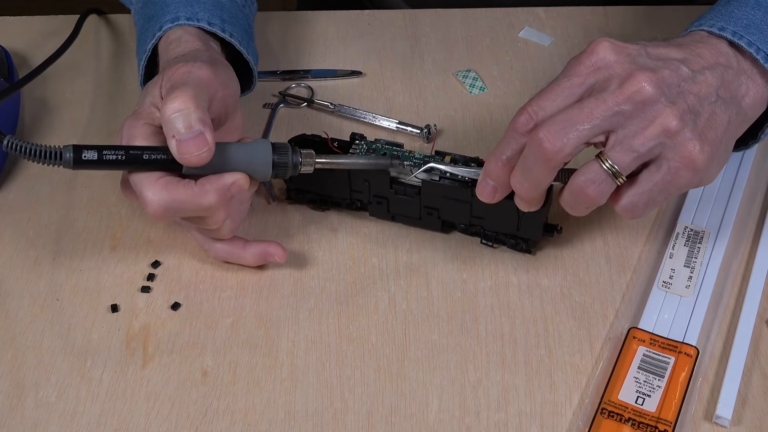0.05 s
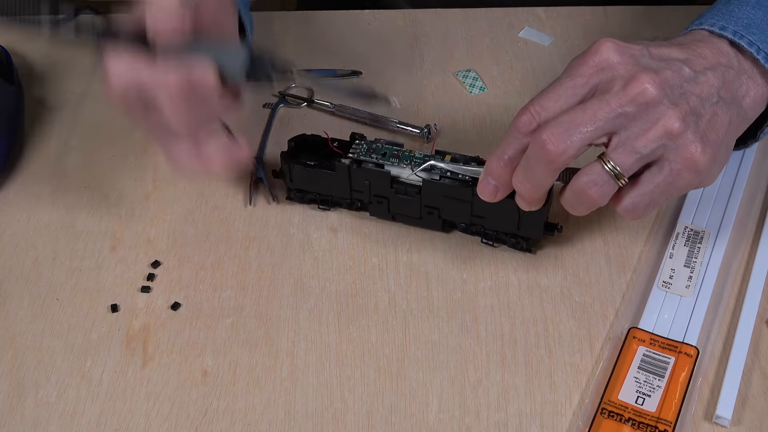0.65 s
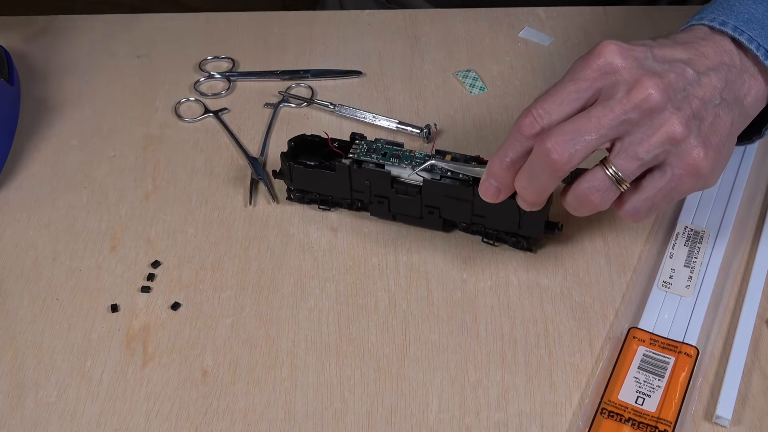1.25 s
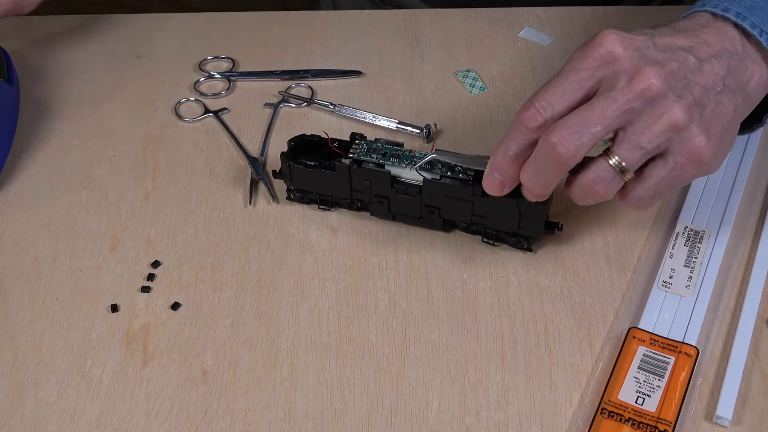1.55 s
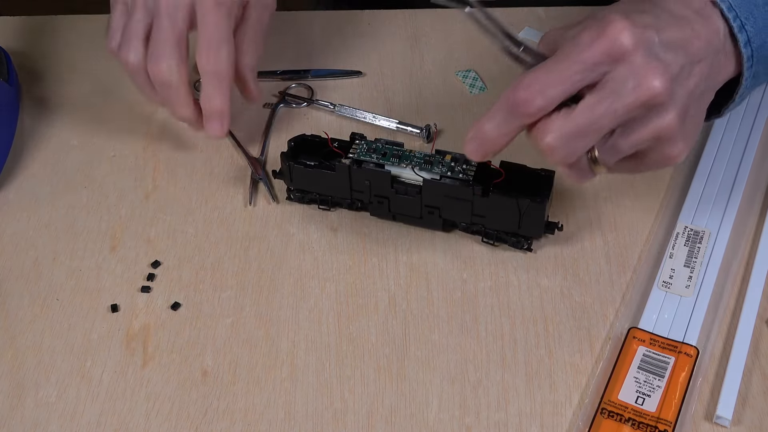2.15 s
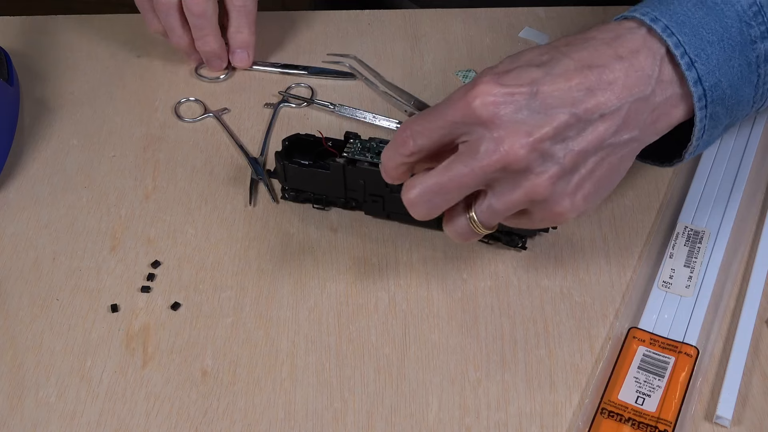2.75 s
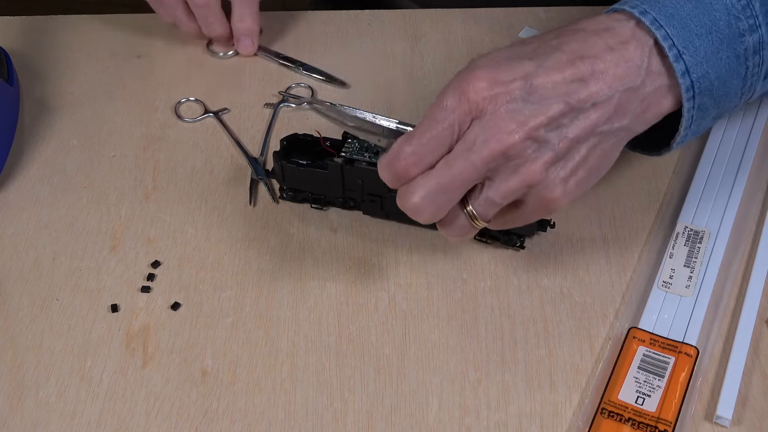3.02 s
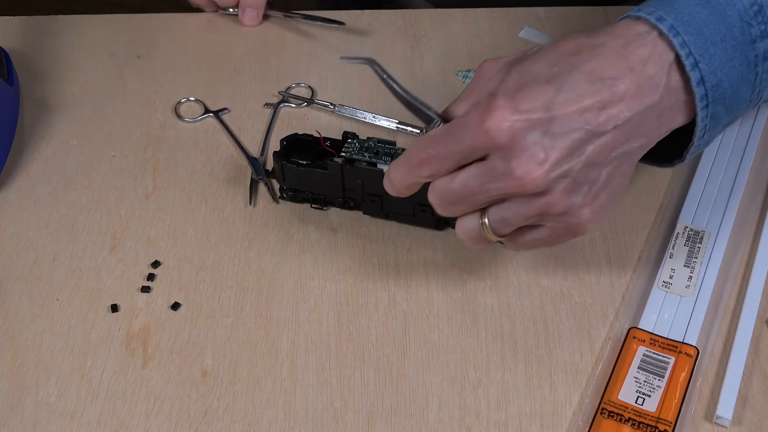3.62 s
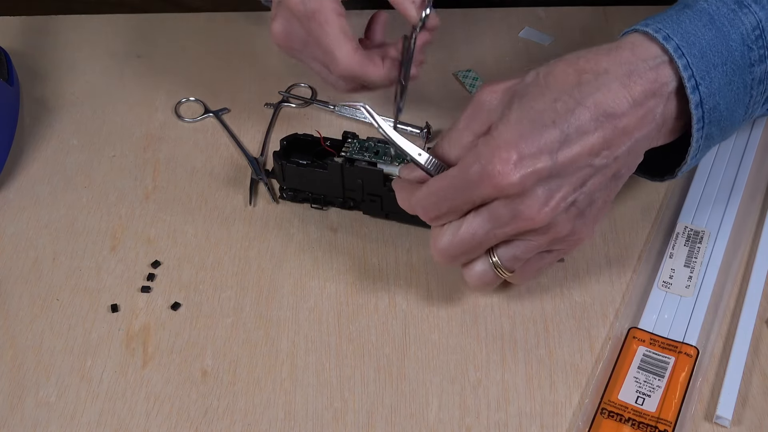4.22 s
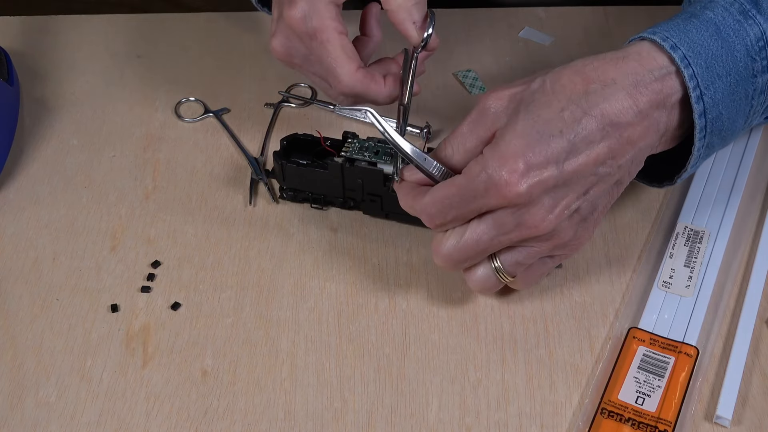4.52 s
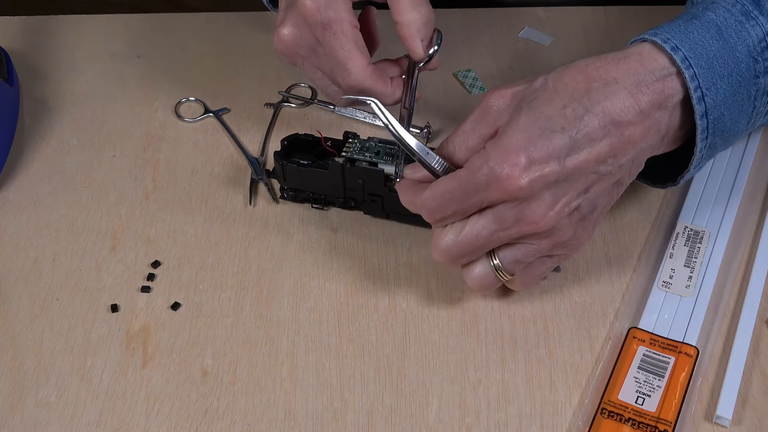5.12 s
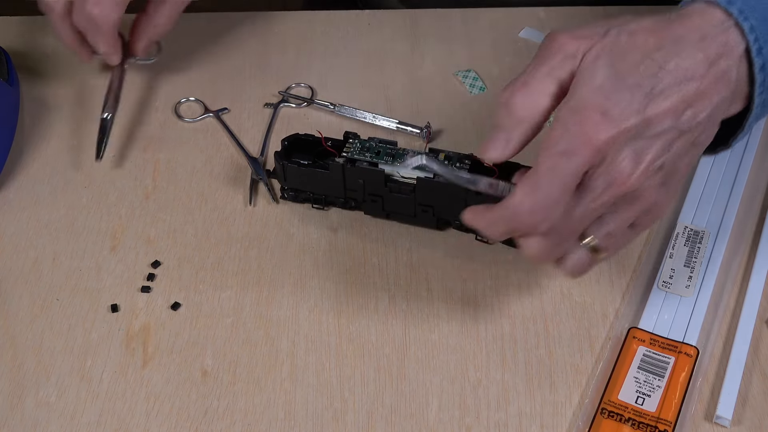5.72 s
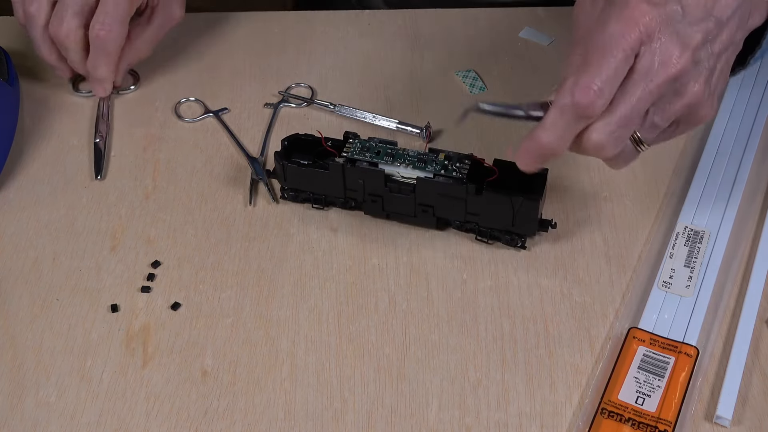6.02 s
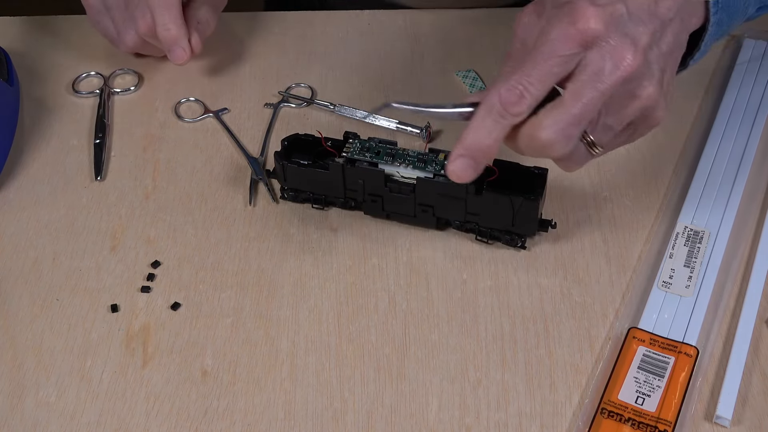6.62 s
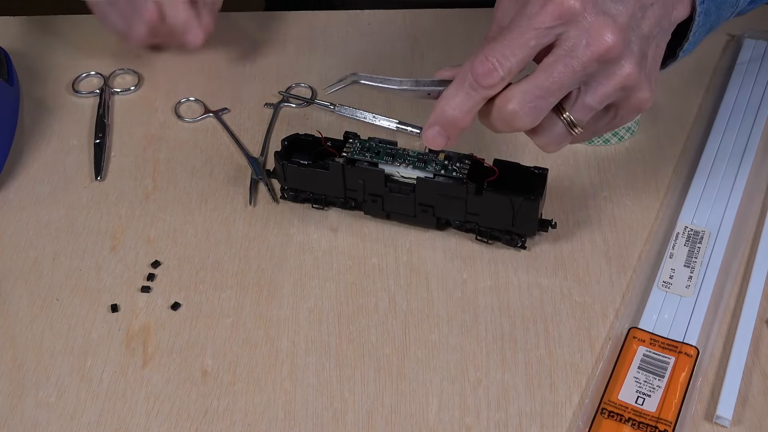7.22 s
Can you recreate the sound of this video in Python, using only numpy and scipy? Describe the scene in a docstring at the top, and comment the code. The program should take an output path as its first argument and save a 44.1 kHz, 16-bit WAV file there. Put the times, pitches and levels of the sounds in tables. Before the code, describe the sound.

Small metal tools tick and scrape on a wooden workbench, with a knocking clatter, one scissor snip and a clink as the scissors land.

```python
"""A low thump comes first: a forearm bumps a plywood bench in a small quiet room. Tweezers tick on a
model locomotive chassis, which slips and knocks on the wood. Small scissors are dragged over the grain,
snip once and are laid down, tips first, then handles; a sleeve slides over the wood. Blows are noise
cracks plus ringing peaks, slides are friction noise through resonances. The loudest clicks overload."""
import sys
import numpy as np
from scipy import signal
from scipy.io import wavfile

SR = 44100
rng = np.random.default_rng(int(sys.argv[2]) if len(sys.argv) > 2 else 0)


def generate_wav(sig):
    """Save sig (samples, or channels by samples) to the path in sys.argv[1] as 16-bit PCM at SR."""
    pcm = np.round(np.clip(np.atleast_2d(sig).T, -1, 1) * 32767).astype(np.int16)
    wavfile.write(sys.argv[1], SR, pcm)


N = 324784
TIME_S = np.arange(N) / SR
AGE_S = TIME_S[:SR // 2]
CUTOFF_HZ = 16000
EDGES_HZ = 16000 / 2 ** np.arange(9.5, -.1, -.5)   # half-octave bands
CENTRES_HZ = np.sqrt(EDGES_HZ[1:] * EDGES_HZ[:-1])
BANK = [signal.butter(2, band, "band", fs=SR, output="sos") for band in zip(EDGES_HZ, EDGES_HZ[1:])]


# chassis knocks [t/s, level/dB, tilt/(dB/oct)]
CHASSIS_HITS = [(1.3445, -29.5, 0), (1.3732, -12, 0.57), (1.3916, -10, 2), (1.4152, -15.5, 0.5),
                (1.4185, -21, -1), (1.472, -34.5, -3)]
# clack spectrum [f/Hz, density/dB]
CHASSIS_CLACK = [(45, -31.5), (110, -5.5), (290, 3.5), (520, 0), (760, -9), (1200, -5.5), (2400, -6.5),
                 (4200, -13.5), (6300, -19.5), (8200, -15), (11000, -31.5), (16000, -31)]
# chassis on plywood, modes [f/Hz, relative level/dB, t60/s]
CHASSIS_MODES = [(118, -12.5, 0.42), (218, -6.5, .19), (322, 1, 0.07), (365, -3.5, 0.079), (393, 2, .12),
                 (481.3, -7.5, 0.11), (587, -10.5, 0.2), (1147, -12.5, .15), (1314, -10, 0.14),
                 (2310, -0.5, 0.11), (2746, -6.5, 0.066), (4700, -8, 0.08), (8290, -1, 0.027)]
def chassis():
    """The heavy chassis drops from corner to corner."""
    decay = crack_and_tail(crack_t60_s=0.024, tail_db=-9.5, tail_t60_s=0.095, slope=0.12)
    return blows(CHASSIS_HITS, CHASSIS_CLACK, CHASSIS_MODES, decay, ring_db=-6.5)


# blade contacts [t/s, level/dB, tilt/(dB/oct)]
SNIP_HITS = [(5.3245, -21, 1), (5.3263, -13, 0.5), (5.3745, -41, 0)]
# snap spectrum [f/Hz, density/dB]
SNIP_CRACK = [(60, -14.5), (280, -10), (450, -18.5), (650, -7), (1100, -11.5), (1900, 7), (3200, -8),
              (5500, -9), (8000, -6), (13000, -0.5), (16000, -4.5)]
# brief ringing peaks that colour the snap [f/Hz, relative level/dB, t60/s]
SNIP_PEAKS = [(296, -20.5, 0.16), (676, -6, 0.016), (2230, 6, 0.0064), (4730, 6, 0.0056), (7810, 6, 0.011),
              (11500, 5.5, .006), (12620, 9.5, .007), (14040, 0, .006)]
def snip():
    """The blades bite through and snap shut in mid-air; the fingers damp them at once."""
    decay = crack_and_tail(crack_t60_s=0.0071, tail_db=-32, tail_t60_s=0.09, slope=0.0199)
    return blows(SNIP_HITS, SNIP_CRACK, SNIP_PEAKS, decay, ring_db=0)


# tip bounces [t/s, level/dB, tilt/(dB/oct)]
TIP_HITS = [(5.8626, -16.5, 0.8), (5.8645, -25.5, -1), (5.8766, -25.5, 0), (5.8845, -30, -2),
            (5.8925, -31, -5)]
# clack spectrum [f/Hz, density/dB]
TIP_CLACK = [(70, -32.5), (250, -3), (480, 3), (800, -5), (1300, -12), (1800, -1.5), (2700, -21.5),
             (3700, 0.5), (4800, -13), (5800, -12), (7500, -26.5), (16000, -38)]
# blades on plywood, modes [f/Hz, relative level/dB, t60/s]
TIP_MODES = [(374, -11, 0.11), (487, -6.5, 0.068), (542, 5, 0.05), (634, -11, 0.15), (1040, 0.5, 0.0389),
             (1688, 1, 0.047), (2253, 0.5, 0.04), (3600, 3.5, 0.044), (3910, 0.5, 0.02)]
def scissor_tips():
    """The tips land on the wood and bounce."""
    decay = crack_and_tail(crack_t60_s=0.0078, tail_db=-15.5, tail_t60_s=0.1, slope=0.16)
    return blows(TIP_HITS, TIP_CLACK, TIP_MODES, decay, ring_db=-5)


# handle bounces [t/s, level/dB, tilt/(dB/oct)]
HANDLE_HITS = [(6.0566, -13, 6.5), (6.0643, -29.5, -5.5), (6.0686, -13, 0), (6.0790, -20.5, -2.5)]
# clink spectrum [f/Hz, density/dB]
HANDLE_CLINK = [(60, -26), (250, -13), (500, -8), (1400, -1), (2300, -2), (4400, 1.5), (6000, 0.5),
                (8000, -16), (16000, -26)]
# handle modes [f/Hz, relative level/dB, t60/s]
HANDLE_MODES = [(471, -4.5, .15), (918, -2, 0.2), (1340, -0.5, 0.044), (1730, 1.5, 0.07), (3257, -6.5, 0.2),
                (3640, 1, 0.046), (4310, 22, 0.01), (6100, 8.5, 0.017)]
def scissor_handles():
    """The handles drop and bounce with a brighter clink."""
    decay = crack_and_tail(crack_t60_s=0.01, tail_db=-10, tail_t60_s=0.22, slope=0.17)
    return blows(HANDLE_HITS, HANDLE_CLINK, HANDLE_MODES, decay, ring_db=-13.5)


# bumps on the wood [t/s, level/dB, tilt/(dB/oct)]
TAP_HITS = [(.693, -43.5, 0), (.818, -33.5, 0.3), (1.0635, -40, 3.5), (1.523, -38, 1.5), (1.573, -46, -5.5),
            (1.629, -36.5, -4), (2.538, -43.5, -2), (2.725, -36, 0), (2.754, -42, -7), (3.2185, -31.5, 3.5),
            (3.447, -33.5, -2.5), (6.802, -49.5, 0.5)]
# thud spectrum [f/Hz, density/dB]
TAP_THUD = [(40, -19), (140, 6.5), (300, 4.5), (600, -1.5), (1000, -6.5), (1750, -9.5), (2600, -60),
            (7000, -43.5), (16000, -72)]
# plywood modes [f/Hz, relative level/dB, t60/s]
BENCH_MODES = [(225.3, -2.5, 0.061), (485.7, -5.5, 0.027)]
def taps():
    """Soft contacts of fingers and tools stir only the wood."""
    decay = crack_and_tail(crack_t60_s=0.029, tail_db=-11.5, tail_t60_s=0.14, slope=0.1)
    return blows(TAP_HITS, TAP_THUD, BENCH_MODES, decay, ring_db=-7.5)


# small steel contacts [t/s, level/dB, centre f/Hz]
TICKS = [(0.9876, -30, 10200), (1.002, -46, 8800), (1.064, -57, 7500), (1.628, -45.5, 4600),
         (1.736, -47.5, 14000), (1.764, -42.5, 13500), (1.7742, -40, 13450), (2.7279, -42.5, 9300),
         (2.757, -41, 13500), (3.149, -40, 12700), (3.852, -35.5, 7000), (4.527, -54.5, 5500),
         (5.513, -47, 13460), (5.661, -47, 11600), (6.469, -40, 8100), (6.521, -52, 11500)]
def ticks(rise_db_oct=10, fall_db_oct=30):
    """Fine steel points click in a broad band that ends steeply above its centre."""
    out, decay = np.zeros(N), band_decay(t60_s=0.034, slope=0.11)
    for s, db, hz in TICKS:
        octaves = np.log2(CENTRES_HZ / hz)
        gains = unit(from_db(np.minimum(rise_db_oct * octaves, -fall_db_oct * octaves)))
        lowpass = signal.butter(2, min(1.18 * hz, CUTOFF_HZ), fs=SR, output="sos")
        click = signal.sosfilt(lowpass, burst(gains, decay))
        add(out, s, blow_gain(db) * unit(click))
    return out


# tweezer touches [t/s, peak level/dB]
TWEEZER_TOUCHES = [(2.757, -45.5), (4.0316, -53), (4.265, -50), (5.5137, -47), (5.6617, -46)]
# other steel ringing free [t/s, f/Hz, peak level/dB, t60/s]
PINGS = [(1.0029, 1140, -29.5, 0.021), (1.4786, 1282, -27, 0.095), (1.523, 1520, -40, 0.025),
         (1.628, 1302, -43, 0.099), (6.225, 2930, -26, 0.011)]
def steel_rings():
    """Brushed tweezers sing their one note; other steel pings at its own pitches."""
    out = np.zeros(N)
    for s, db in TWEEZER_TOUCHES:
        add(out, s, from_db(db) * ring(hz=3620, t60_s=0.086))
    for s, hz, db, t60_s in PINGS:
        add(out, s, from_db(db) * ring(hz, t60_s))
    return out


# scissor pulls [start t/s, fastest t/s, end t/s, level/dB, tilt/(dB/oct)]
PULLS = [(2.584, 2.607, 2.79, -44.5, 0.6), (2.878, 3, 3.26, -45, -0.5), (3.029, 3.109, 3.15, -34, -0.44),
         (3.18, 3.35, 3.366, -37.5, 0), (3.34, 3.418, 3.553, -39.5, 0), (3.546, 3.56, 3.64, -45, 0.5),
         (3.669, 3.793, 3.84, -48, 2.5), (3.81, 3.855, 3.853, -34, 3.5)]
# steel sliding on plywood [f/Hz, density/dB]
DRAG_HISS = [(60, -24), (220, -1.5), (480, -6), (720, -15.5), (1250, -11.5), (2700, -16.5), (5300, -17.5),
             (12000, -21), (16000, -35)]
# scissor and bench resonances [f/Hz, width/Hz]
DRAG_PEAKS = [(320, 44), (490, 68), (1080, 250), (1470, 71), (3150, 200), (4250, 250), (5280, 300),
              (6650, 67), (7650, 120)]
def scissor_drag(resonance_db=5, grit_db=-9, drift=0.023):
    """Steel catches on grain and specks; resonances drift, come and go as the contact shifts."""
    pulls = np.array([from_db(db) * pull(*times_s) for *times_s, db, _ in PULLS])
    level = pulls.max(axis=0)
    tilt_db_oct = np.array(PULLS)[pulls.argmax(axis=0), -1] * (level > from_db(-90))
    catches = grain(per_s=660, depth_db=2)
    grit = from_db(grit_db) * specks(per_s=140, spread_db=2)
    friction, resonant = np.zeros(N), np.zeros(N)
    for gain, hz, sos in zip(band_gains(DRAG_HISS), CENTRES_HZ, BANK):
        brightness = from_db(tilt_db_oct * np.log2(hz / 1500))
        force = catches * rng.standard_normal(N) + grit * np.sqrt(hz / 2500)
        friction += gain * brightness * rms_one(signal.sosfilt(sos, force))
    for hz, width_hz in DRAG_PEAKS:
        moving_hz = hz * (1 + drift * wander(per_s=7))
        resonant += grain(per_s=14, depth_db=4) * resonance(friction, moving_hz, width_hz)
    return level * rms_one(friction + from_db(resonance_db) * resonant)


def pull(start_s, fastest_s, end_s, slow_db=-8, grip_t60_s=0.12, stop_t60_s=0.07):
    """Envelope of a pull: takes hold, speeds up, slows, stops."""
    speed_db = np.interp(TIME_S, [start_s, fastest_s, end_s], [slow_db, 0, slow_db])
    outside = np.maximum((start_s - TIME_S) / grip_t60_s, (TIME_S - end_s) / stop_t60_s)
    return from_db(speed_db - 60 * np.clip(outside, 0, 2))


# tool and chassis scrapes, and the bright swell just after the snip [middle t/s, length/s, level/dB,
# tilt/(dB/oct)]
SCRAPES = [(0.73, 0.15, -58, 0), (1.362, 0.027, -34.5, 0), (1.598, 0.068, -42.5, -4.5),
           (5.362, 0.086, -42, 10.5), (5.481, 0.019, -47, -0.5), (5.65, 0.044, -47.5, 1.5),
           (5.728, 0.13, -57, 29), (7.29, 0.03, -46.5, 3)]
def scrapes():
    """Short gritty strokes of steel on wood swell and stop; just after the snip a bright, gritty swell rises
    and fades the same way."""
    out, catches = np.zeros(N), grain(per_s=780, depth_db=2.5)
    for s, length_s, db, tilt_db_oct in SCRAPES:
        stroke = np.pad(np.sqrt(np.hanning(int(length_s * SR))), (0, len(AGE_S)))
        scrape = burst(band_gains(DRAG_HISS, tilt_db_oct), stroke * catches[:len(stroke)])
        add(out, s - length_s / 2, from_db(db) * np.sqrt(length_s * SR) * scrape)
    return out


# rubbed notes [middle t/s, length/s, f/Hz, level/dB]
RUBS = [(2.65, 0.1, 1216, -49), (3.839, 0.067, 505, -41), (3.94, .17, 6800, -62), (4.24, 0.19, 3640, -65),
        (5.51, 0.054, 3730, -57), (5.648, 0.062, 1260, -48.5)]
def rubs(q=20):
    """A rubbed tool, or the wood under it, sings a soft, breathy note."""
    out = np.zeros(N)
    for s, length_s, hz, db in RUBS:
        stroke = np.sqrt(np.hanning(int(length_s * SR)))
        note = signal.lfilter(*signal.iirpeak(hz, q, SR), rng.standard_normal(len(AGE_S)))
        add(out, s - length_s / 2, from_db(db) * stroke * rms_one(note[-len(stroke):]))
    return out


# cloth on wood [f/Hz, density/dB]
SLEEVE_HISS = [(50, -9), (184, -1.5), (500, -7.5), (850, -10.5), (1200, -9.5), (2000, -9.5), (2750, -12),
               (10400, -14.5), (16000, -29)]
# resonances under the sleeve [f/Hz, width/Hz]
SLEEVE_PEAKS = [(1260, 220), (1880, 370)]
def sleeve(level_db=-39, resonance_db=-5.5, threads_db=-7):
    """Cloth slides evenly over the wood, threads catching, and comes to rest."""
    slide = swell(start_s=6.215, attack_s=0.031, hold_s=0.39, t60_s=0.5)
    snag = burst(band_gains(SLEEVE_HISS), band_decay(t60_s=0.0068, slope=0.1))
    threads = scatter(snag, per_s=420, spread_db=3.5)
    cloth = hiss(SLEEVE_HISS, grain(per_s=200, depth_db=1.4)) + from_db(threads_db) * threads
    wood = sum(grain(per_s=16, depth_db=3) * resonance(cloth, *peak) for peak in SLEEVE_PEAKS)
    return from_db(level_db) * slide * rms_one(cloth + from_db(resonance_db) * wood)


# grip changes [middle t/s, length/s, bump level/dB, rustle level/dB]
GRIPS = [(0.874, 0.52, -54, -77), (1.72, 0.28, -53.5, -69), (2.152, 0.12, -49.5, -72),
         (4.022, 0.79, -59, -60), (4.255, 0.25, -55, -61), (5.437, 0.41, -54, -60.5)]
# finger bumps [f/Hz, density/dB]
HAND_BUMP = [(30, -9), (120, 3.5), (260, 0.5), (450, -10.5), (900, -15.5), (3000, -31.5), (16000, -51.5)]
# skin rustle [f/Hz, density/dB]
SKIN_RUSTLE = [(200, -8.5), (1000, 2.5), (4000, -2), (13000, -4.5), (16000, -4.5)]
def hands(holding_from_s=0.704, rest_bump_db=-60.5, rest_rustle_db=-64, tick_db=-10):
    """Fingers bump, rustle and shift steel: faintly while holding, more at each change of grip."""
    holding = np.clip((TIME_S - holding_from_s) * 10 + 1, 0, 1)
    middle_s, length_s, bump_db, rustle_db = np.transpose(GRIPS)
    shifts = np.exp(-8 * ((TIME_S - middle_s[:, None]) / length_s[:, None]) ** 2)
    bump_level = np.hypot(from_db(rest_bump_db) * holding, from_db(bump_db) @ shifts)
    rustle_level = np.hypot(from_db(rest_rustle_db) * holding, from_db(rustle_db) @ shifts)
    skin = hiss(SKIN_RUSTLE, grain(per_s=250, depth_db=1.5))
    tick = burst(band_gains(SKIN_RUSTLE, tilt_db_oct=2.7), band_decay(t60_s=0.034, slope=0.066))
    steel = from_db(tick_db) * scatter(tick, per_s=16, spread_db=5)
    bumps = hiss(HAND_BUMP, grain(per_s=39, depth_db=5))
    return bump_level * bumps + rustle_level * (skin + steel)


# forearm bumps [t/s, level/dB]
ARM_BUMPS = [(0, -19.5), (0.055, -26), (.12, -37.5)]
# bench rumble [f/Hz, density/dB]
SHUDDER_RUMBLE = [(20, 0), (54, 4.5), (188, -11), (580, -44), (2500, -46.5), (5500, -59)]
def bench_shudder():
    """Each bump of the forearm sets off a low rumble that soon dies."""
    level = sum(from_db(db) * swell(s, attack_s=0.0013, hold_s=0, t60_s=0.15) for s, db in ARM_BUMPS)
    return level * hiss(SHUDDER_RUMBLE)


def room(x, wet_db=-25, delay_samples=SR // 100):
    """The walls add a faint diffuse tail, duller than the direct sound."""
    gains = band_gains([(100, -11), (400, 4.5), (16000, 2)], tilt_db_oct=-2.1)
    tail = np.pad(burst(gains, band_decay(t60_s=0.21, slope=0.057)), (delay_samples, 0))
    return x + from_db(wet_db) * signal.fftconvolve(x, tail)[:N]


# still room [f/Hz, density/dB]
ROOM_AIR = [(12, -45), (20, -16), (58, -6.5), (86, -20.5), (241, -13), (270, -26), (780, -22), (897, -27.5),
            (8410, -36.5), (16000, -40)]
def room_air(level_db=-60.5):
    """Faint steady noise, mostly lows."""
    return from_db(level_db) * hiss(ROOM_AIR)


def blows(hits, spectrum, peaks, decay, ring_db):
    """Each blow: a crack of dense resonances plus ringing peaks whose strengths vary with the spot."""
    out = np.zeros(N)
    for s, db, tilt_db_oct in hits:
        add(out, s, blow_gain(db) * burst(band_gains(spectrum, tilt_db_oct), decay))
        for hz, peak_db, t60_s in peaks:
            colour_db = tilt_db_oct * np.log2(hz / 2000)
            spot_db = rng.normal(0, 1)
            add(out, s, from_db(db + ring_db + peak_db + colour_db + spot_db) * ring(hz, t60_s))
    return out


def blow_gain(db):
    """Gain for a blow whose level is its energy spread over 10 ms."""
    return from_db(db) * np.sqrt(SR / 100)


def crack_and_tail(crack_t60_s, tail_db, tail_t60_s, slope, build_s=0.0029):
    """Band envelopes: a fast crack, then the slower shiver that builds up in the bench."""
    tail = band_decay(tail_t60_s, slope) * (1 - np.exp(-AGE_S / build_s))
    return np.hypot(band_decay(crack_t60_s, slope), from_db(tail_db) * tail)


def band_decay(t60_s, slope):
    """Unit-energy decay per band; t60_s holds at 2 kHz, lows last longer."""
    band_t60_s = t60_s * (CENTRES_HZ / 2000) ** -slope
    return np.array([unit(from_db(-60 * np.minimum(AGE_S / t, 4))) for t in band_t60_s])


def ring(hz, t60_s):
    """One decaying sine."""
    return np.sin(2 * np.pi * hz * AGE_S) * from_db(-60 * AGE_S / t60_s)


def swell(start_s, attack_s, hold_s, t60_s):
    """Envelope: rise, hold, decay."""
    age_s = np.maximum(TIME_S - start_s, 0)
    return (1 - np.exp(-age_s / attack_s)) * from_db(-60 * np.clip((age_s - hold_s) / t60_s, 0, 2))


def band_gains(spectrum, tilt_db_oct=0):
    """Each band's share of a tilted spectrum."""
    hz, db = np.transpose(spectrum)
    band_db = np.interp(np.log(CENTRES_HZ), np.log(hz), db) + tilt_db_oct * np.log2(CENTRES_HZ)
    return unit(from_db(band_db) * np.sqrt(CENTRES_HZ))


def burst(gains, envelopes):
    """Band noise under one envelope, or one per band; energy about one."""
    white = rng.standard_normal((len(BANK), np.shape(envelopes)[-1])) * envelopes + 1e-18
    return sum(gain * unit(signal.sosfilt(sos, noise)) for gain, sos, noise in zip(gains, BANK, white))


def hiss(spectrum, texture=1):
    """Lasting coloured noise; rms one."""
    return rms_one(burst(band_gains(spectrum), np.ones(N) * texture))


def resonance(x, hz, width_hz):
    """Unity-gain band-pass, retuned every 512 samples."""
    out, state = np.zeros(N), np.zeros(2)
    angle_rad = 2 * np.pi * np.broadcast_to(hz, N) / SR
    radius = np.exp(-np.pi * width_hz / SR)
    for i in range(0, N, 512):
        feedback = [1, -2 * radius * np.cos(angle_rad[i]), radius ** 2]
        out[i:i + 512], state = signal.lfilter([1, 0, -1], feedback, x[i:i + 512], zi=state)
    return out * (1 - radius ** 2) / 2


def grain(per_s, depth_db):
    """Random gain: friction catches and lets go."""
    return rms_one(from_db(depth_db * wander(per_s)))


def wander(per_s):
    """Random course, spread about one."""
    knots = rng.standard_normal(int(N / SR * per_s) + 2)
    return np.interp(TIME_S * per_s, np.arange(len(knots)), knots)


def specks(per_s, spread_db):
    """Uneven impulses at random times; rms one."""
    sizes = from_db(spread_db * np.minimum(rng.exponential(1, N), 2)) * rng.choice([-1, 1], N)
    return rms_one(sizes * (rng.random(N) < per_s / SR))


def scatter(sound, per_s, spread_db):
    """One small sound repeated at random times and sizes; rms one."""
    return rms_one(signal.fftconvolve(specks(per_s, spread_db), sound)[:N])


def from_db(db):
    """Decibels to gain."""
    return 10 ** (np.asarray(db) / 20)


def unit(x):
    """Scale to energy one."""
    return x / np.sqrt(np.sum(x ** 2) + 1e-20)


def rms_one(x):
    """Scale to rms one."""
    return unit(x) * np.sqrt(len(x))


def add(out, s, sound):
    """Mix a sound in from second s on."""
    part = out[round(s * SR):][:len(sound)]
    part += sound[:len(part)]


def scene():
    """The bench from close above, mono."""
    impacts = chassis() + snip() + scissor_tips() + scissor_handles() + taps() + ticks() + steel_rings()
    friction = scissor_drag() + scrapes() + rubs() + sleeve()
    handling = hands() + bench_shudder()
    return (room(impacts + friction + handling) + room_air())[None]


def record(dry):
    """Clip the loudest peaks, then cut the top."""
    lowpass = signal.ellip(10, 0.1, 80, CUTOFF_HZ, fs=SR, output="sos")
    return signal.sosfilt(lowpass, np.clip(dry, -1, 1))


dry = scene()
out = record(dry)
generate_wav(out)
```